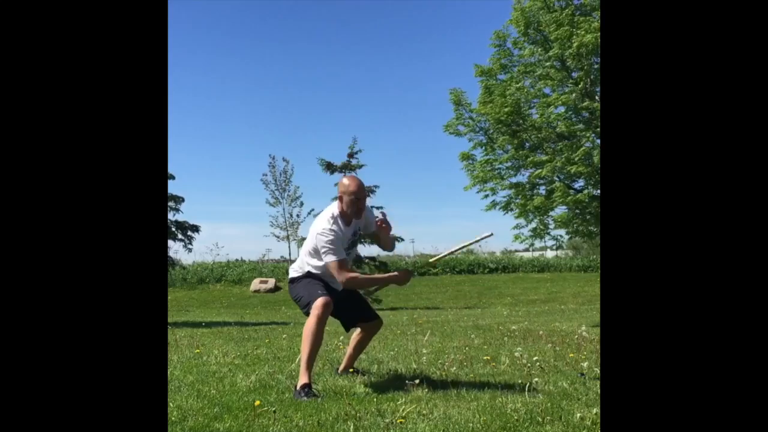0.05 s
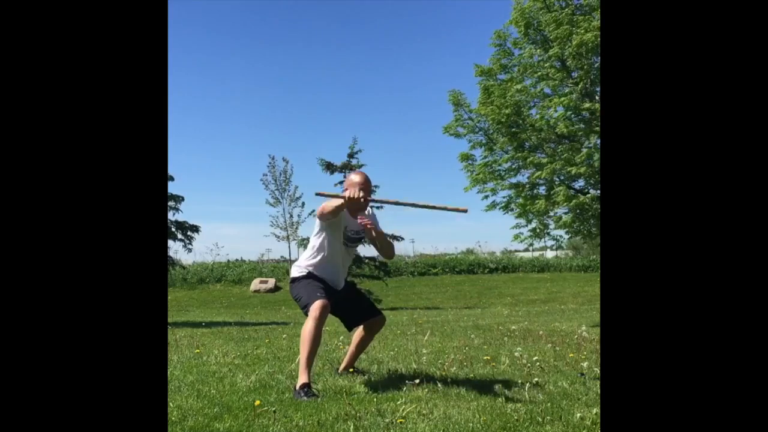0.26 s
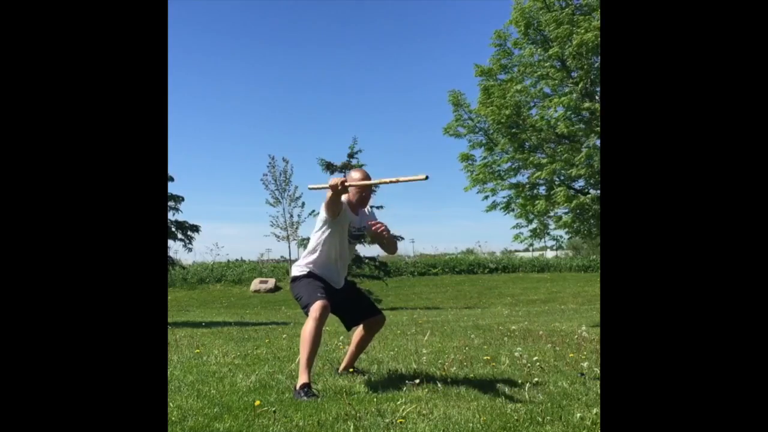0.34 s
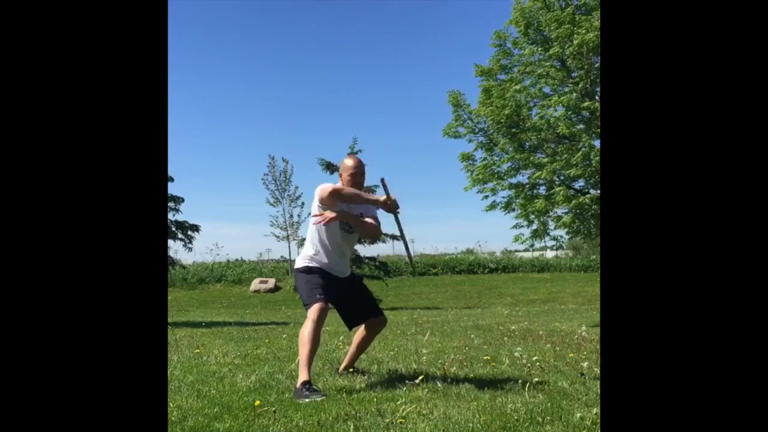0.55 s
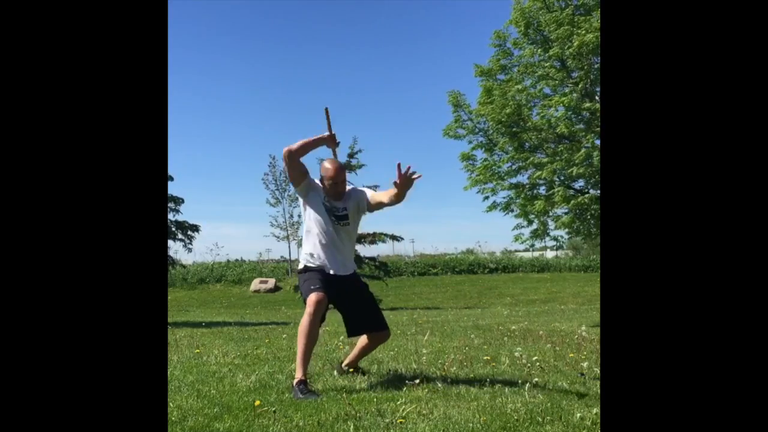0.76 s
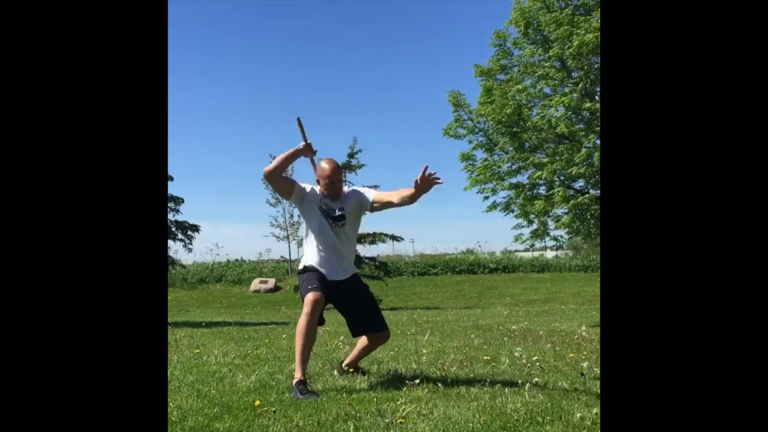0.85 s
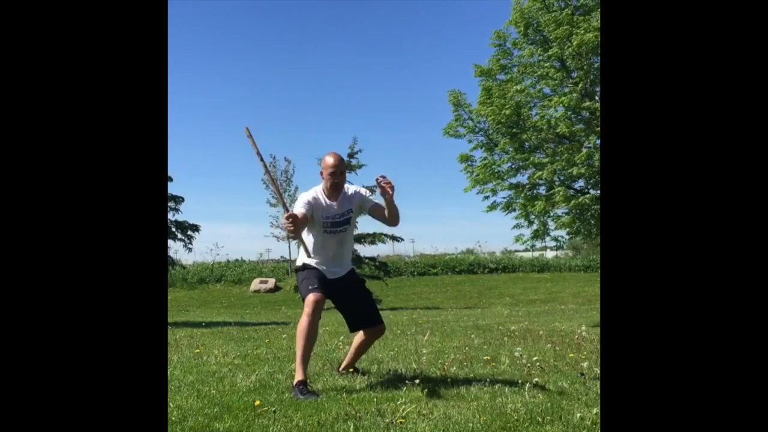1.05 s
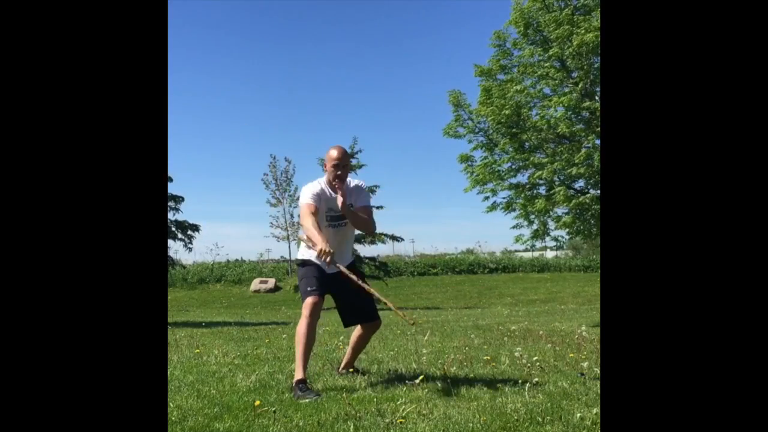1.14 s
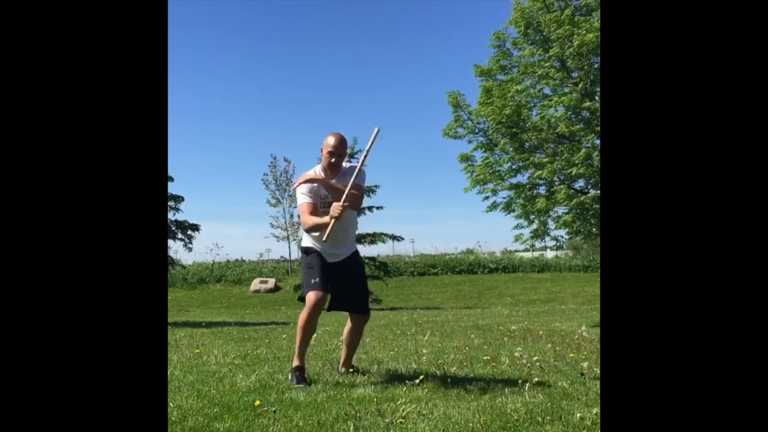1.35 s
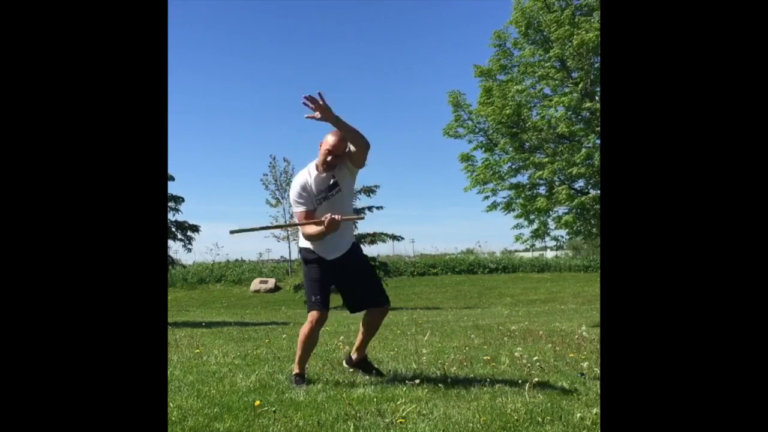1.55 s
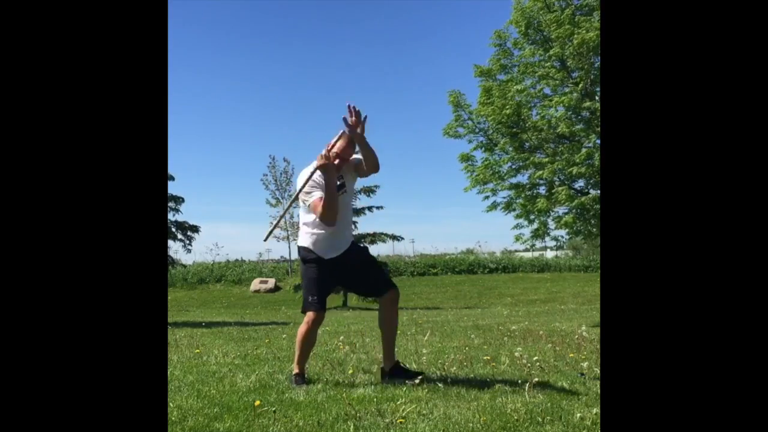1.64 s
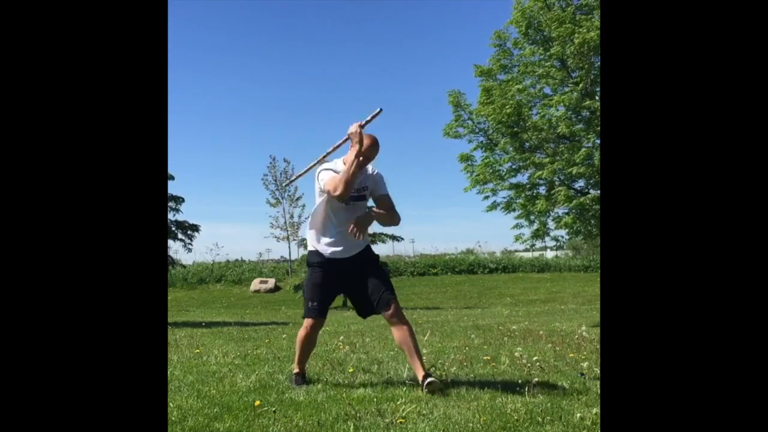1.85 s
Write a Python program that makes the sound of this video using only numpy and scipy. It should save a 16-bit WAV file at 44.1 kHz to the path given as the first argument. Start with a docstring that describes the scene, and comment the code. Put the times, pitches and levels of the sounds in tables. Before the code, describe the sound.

One sharp stick slap on a palm, followed by light swishes, body slaps and faint birdsong.

```python
"""Stick drill on an open lawn.

A stick cracks once against a bare hand: the impact excites damped modes, the turf reflects
the sound and the trees scatter it back. Softer slaps land on the body, sleeves and stick
swish through the air, and footwork thumps on the turf. Small birds twitter in the trees
over a low rumble and faint far whistles, while a light breeze buffets the microphone."""
import sys
import numpy as np
from scipy import signal
from scipy.fft import rfft, irfft
from scipy.io import wavfile

SR = 44100
rng = np.random.default_rng(int(sys.argv[2]) if len(sys.argv) > 2 else 0)


def transcribe(u):
    """Save the signal u as a 16-bit wav file named by the first command-line argument.

    u: samples, shape (n,) or (channels, n), limited to [-1, 1]; the rate is SR.
    q: integer samples, one column per channel.
    """
    v = np.clip(np.atleast_2d(u).T, -1, 1)
    q = np.round(v * 32767).astype(np.int16)
    wavfile.write(sys.argv[1], SR, q)


N = 83790
T = np.arange(N) / SR

# Envelopes of the breeze, the rumble and the flock. Each row: time in seconds, level in dB.
GUST_LEVELS = [(0, -100), (.045, -61), (.31, -65), (.52, -64.5), (.62, -56), (.66, -71.5), (.76, -59.5),
               (.85, -62.5), (1.01, -56.5), (1.17, -58.5), (1.22, -74), (1.33, -60), (1.78, -70),
               (1.845, -56.5), (1.9, -74)]
RUMBLE_LEVELS = [(0, -55), (.15, -63.5), (.3, -65), (.75, -67), (1.0, -59.5), (1.17, -69), (1.43, -57.5),
                 (1.7, -65.5), (1.9, -65)]
TWITTER_LEVELS = [(.03, -61), (.13, -61.5), (.2, -60.5), (.3, -79.5), (.42, -64.5), (.56, -88), (.76, -68),
                  (.87, -62.5), (1.02, -72.5), (1.18, -78.5), (1.46, -62), (1.55, -93.5), (1.72, -72),
                  (1.9, -69)]
# Spectra of the noise sources. Each row: frequency in Hz, relative spectral density in dB.
GUST_SPECTRUM = [(22, -32), (36, -10.5), (50, 1.5), (75, -2), (110, -5), (170, -31.5), (400, -72)]
RUMBLE_SPECTRUM = [(60, -8.5), (130, 2.5), (250, 2), (340, -8), (480, -23.5), (1000, -64)]
AIR_SPECTRUM = [(500, -1.5), (1100, -3.5), (2100, -8.5), (2800, -4.5), (3600, -14), (6200, -10.5),
                (7500, -16.5), (13000, -22.5), (16000, -22.5)]
SWISH_SPECTRUM = [(200, -19.5), (500, -20.5), (850, -12), (1200, -1.5), (1650, -0.5), (2400, -8.5),
                  (3300, -2), (4700, -1), (9000, -9.5), (16000, -19)]
SLAP_SPECTRUM = [(200, -10), (480, -23), (720, -2), (1130, 0), (1600, -10.5), (2200, 2.5), (3100, 2.5),
                 (4300, -10), (6600, -1), (8000, -8), (11000, -7.5), (16000, -16)]
SKIN_SPECTRUM = [(200, -33), (700, -27), (1300, -18.5), (3000, 0), (5000, 19), (11000, 22), (16000, -11)]
# Far whistles. Each row: start in seconds, length in seconds, frequency in Hz, level in dB.
FAR_WHISTLES = [(0.497, 0.45, 2799, -78), (1.029, 0.14, 1188, -73), (1.155, 0.027, 7480, -71.5),
                (1.447, 0.082, 7380, -70), (1.527, 0.043, 7380, -69.5), (1.621, 0.08, 1146, -66.5)]
# Bird notes. Each row: start and length in seconds, first and last pitch in Hz, relative level in dB.
BIRD_NOTES = [(0.074, 0.026, 6050, 6020, -56), (0.117, .011, 4300, 5600, -57),
              (0.372, 0.057, 5744, 6225, -57), (0.443, .022, 3200, 3780, -62.5),
              (0.484, 0.013, 4600, 4950, -59.5), (0.739, 0.017, 4500, 5380, -57),
              (0.79, 0.045, 5650, 6360, -61.5), (0.823, .03, 4100, 4810, -61),
              (0.893, 0.024, 4300, 4730, -59), (0.984, 0.065, 5850, 5504, -56),
              (1.21, 0.022, 4780, 4100, -69), (1.257, 0.0227, 3210, 3670, -59),
              (1.376, 0.032, 5700, 6550, -62.5), (1.394, 0.0225, 4070, 4340, -63.5),
              (1.718, 0.019, 6150, 5970, -55.5), (1.742, 0.047, 5500, 5660, -63)]
# One bird's buzzy falling phrase. Each row: as for the notes, timed from the start of the phrase.
PHRASE_NOTES = [(0, 0.015, 3700, 3410, -5), (.023, 0.015, 3260, 3710, 0.5), (0.04, 0.021, 3346, 3210, -6.5),
                (.06, 0.016, 3050, 2900, -4)]
# Repeats of that phrase. Each row: start in seconds, relative level in dB.
PHRASE_STARTS = [(0.077, -51), (0.918, -54), (1.651, -55.5)]
# Footwork. Each row: time of the peak in seconds, level in dB.
FOOT_THUMPS = [(0.378, -44.5), (.483, -44.5), (0.697, -43.5)]
# Swings. Each row: time of fastest motion in seconds, level in dB, rise and fall in seconds,
# tilt in dB per octave.
STICK_SWINGS = [(.025, -58.5, 0.022, 0.028, 3), (0.684, -65.5, 0.013, 0.028, -3),
                (0.73, -58, 0.02, 0.023, -4), (1.318, -59.5, 0.031, 0.044, -1),
                (1.432, -58, 0.033, 0.024, -3.5), (1.651, -61.5, 0.033, 0.075, -4.5),
                (1.669, -60.5, 0.034, 0.06, 8)]
# Light contacts on hand and body. Each row: time of the peak in seconds, level in dB,
# attack and T60 in seconds, tilt in dB per octave.
CONTACTS = [(0.0133, -42.5, 0.00075, 0.0053, -0.5), (0.022, -43.5, 0.0027, 0.024, -2),
            (0.2099, -36, 0.00019, 0.0027, -2), (1.276, -51, 0.00078, .0092, -2),
            (1.2843, -34.5, 0.0014, 0.023, -1), (1.286, -38.5, .0005, 0.0064, 5.5),
            (1.319, -51, .003, .015, -4)]
# Strength of the scatter from lawn and trees. Each row: frequency in Hz, gain in dB.
SCATTER_GAINS = [(200, -10.5), (650, -20.5), (1600, -13), (2400, -4), (3400, -18.5), (8500, -20),
                 (15000, -30)]
# Decay of that scatter. Each row: frequency in Hz, T60 in seconds.
SCATTER_DECAYS = [(200, 0.21), (2400, 0.24), (5000, 0.22), (14000, 0.2)]
# Modes of stick and palm. Each row: frequency in Hz, relative level in dB, T60 in seconds.
HIT_MODES = [(293, -10.5, 0.023), (1305, 1.5, 0.0067), (2377, -2.5, 0.017), (2846, -2.5, 0.017),
             (3827, 3.5, 0.0036), (5750, 3, 0.0057), (7170, 14.5, 0.00089), (11200, 12.5, 0.0011)]
CRACK_S = .21165


def from_db(db):
    """Amplitude grows tenfold for every 20 dB."""
    return 10 ** (np.asarray(db) / 20)


def unit_rms(x):
    """Division by the rms gives a signal unit power."""
    return x / np.sqrt(np.mean(x ** 2) + 1e-20)


def at_hz(points, hz):
    """Interpolation along a logarithmic frequency axis."""
    freqs, values = np.transpose(points)
    return np.interp(np.log(np.maximum(hz, 1)), np.log(freqs), values)


def envelope(rows):
    """A gain that moves linearly in decibels between points in time."""
    return from_db(np.interp(T, *np.transpose(rows)))


def noise(spectrum, tilt_db=0):
    """Spectral shaping colours white noise and tilts it per octave, at unit power."""
    hz = np.maximum(np.fft.rfftfreq(N, 1 / SR), 1)
    gain = from_db(at_hz(spectrum, hz) + tilt_db * np.log2(hz))
    return unit_rms(irfft(rfft(rng.standard_normal(N)) * gain, N))


def decay(t, t60):
    """Exponential damping: unity until t = 0, then 60 dB down in each t60."""
    return np.exp(-np.log(1000) * np.maximum(t, 0) / t60)


def tone(hz):
    """The phase of a sinusoid is the integral of its frequency."""
    return np.sin(2 * np.pi * np.cumsum(hz) / SR)


def open_air():
    """Turbulent pressure on the microphone adds to a low rumble and a faint steady hiss."""
    gusts = envelope(GUST_LEVELS) * noise(GUST_SPECTRUM)
    rumble = envelope(RUMBLE_LEVELS) * noise(RUMBLE_SPECTRUM)
    return gusts + rumble + from_db(-71.5) * noise(AIR_SPECTRUM)


def whistles():
    """Faint tones swell and fade, wavering under slight frequency modulation."""
    waver = .0029 * noise([(10, 0), (60, 0), (300, -40)])
    return sum(from_db(db) * np.sin(np.pi * np.clip((T - start) / length, 0, 1)) * tone(hz * (1 + waver))
               for start, length, hz, db in FAR_WHISTLES)


def twitter():
    """Superposition of short random chirps, gliding up or down, makes the sound of a flock."""
    chirps_per_s, chirp_s, low_hz, high_hz, max_glide = 230, .0142, 3114, 5946, .1324
    progress = np.linspace(0, 1, int(chirp_s * SR))
    flock = np.zeros(N + len(progress))
    for when, pitch, slope in rng.random((int(chirps_per_s * N / SR), 3)):
        centre_hz = low_hz + pitch * (high_hz - low_hz)
        glide = 1 + max_glide * (2 * slope - 1) * (2 * progress - 1)
        start = int(when * N)
        flock[start:start + len(progress)] += np.sin(np.pi * progress) * tone(centre_hz * glide)
    return envelope(TWITTER_LEVELS) * unit_rms(flock[:N])


def bird_note(start, length, first_hz, last_hz, db, flutter):
    """Frequency modulation roughens a linear glide into a warble or a buzz."""
    progress = np.clip((T - start) / length, 0, 1)
    hz = (first_hz + (last_hz - first_hz) * progress) * (1 + flutter)
    return from_db(db) * np.sqrt(2 * np.abs(np.sin(np.pi * progress))) * tone(hz)


def birds():
    """Song arrives by a direct path and again smeared by scattering in the foliage."""
    flutter_hz, warble_depth, buzz_depth = 303, .02805, .042
    flutter = unit_rms(signal.sosfilt(signal.butter(2, flutter_hz, fs=SR, output="sos"),
                                      rng.standard_normal(N)))
    foliage = rng.standard_normal(N) * decay(T, t60=.2)
    song = twitter() + sum(bird_note(*row, warble_depth * flutter) for row in BIRD_NOTES)
    song += sum(bird_note(start + offset, length, first_hz, last_hz, db + accent, buzz_depth * flutter)
                for start, db in PHRASE_STARTS
                for offset, length, first_hz, last_hz, accent in PHRASE_NOTES)
    echo = signal.fftconvolve(song, foliage / np.linalg.norm(foliage))[:N]
    return from_db(-2.5) * song + from_db(-3.5) * echo


def footwork():
    """Each shift of weight on the turf radiates a low wave packet of a few cycles."""
    hz, width_s = 76, .0069
    return sum(from_db(db) * np.exp(-.5 * ((T - peak) / width_s) ** 2)
               * np.sin(2 * np.pi * hz * (T - peak)) for peak, db in FOOT_THUMPS)


def swishes():
    """Flow noise from sleeves and stick rises and falls with the speed of each swing."""
    return sum(from_db(db) * np.exp(-.5 * ((T - peak) / np.where(T < peak, rise, fall)) ** 2)
               * noise(SWISH_SPECTRUM, tilt) for peak, db, rise, fall, tilt in STICK_SWINGS)


def slaps():
    """Heavily damped contacts give brief bursts of noise, duller on cloth than on skin."""
    return sum(from_db(db) * np.exp(np.minimum(T - peak, 0) / attack) * decay(T - peak, t60)
               * noise(SLAP_SPECTRUM, tilt) for peak, db, attack, t60, tilt in CONTACTS)


def scatter(sound):
    """Diffuse scattering from lawn and trees leaves a tail in which each band dies at its own rate."""
    t, tail = T[:N // 3], 0
    hold_exponent = 1.324   # above 1 the echo holds, then drops away
    edges_hz = np.geomspace(140, 17000, 13)
    for low, high in zip(edges_hz, edges_hz[1:]):
        hz = np.sqrt(low * high)
        fade = decay((t / at_hz(SCATTER_DECAYS, hz)) ** hold_exponent, 1)
        bandpass = signal.butter(2, [low, high], "band", fs=SR, output="sos")
        band = signal.sosfilt(bandpass, rng.standard_normal(len(t)))
        tail += band * fade / np.linalg.norm(fade) * from_db(at_hz(SCATTER_GAINS, hz))
    return signal.fftconvolve(sound, tail)[:N]


def crack():
    """Impact excites damped modes of stick and palm, flattening skin smacks, and turf reflects both."""
    ring_db, smack_db, smack_hold_s, turf_db, turf_lag_s = -20.5, -29, .001, -20, .000853
    age = (np.cumsum(T >= CRACK_S) - 1) / SR
    ring = sum((-1) ** k * from_db(ring_db + db) * np.sin(2 * np.pi * hz * age) * decay(age, t60)
               for k, (hz, db, t60) in enumerate(HIT_MODES))
    smack = from_db(smack_db) * noise(SKIN_SPECTRUM) * decay(age - smack_hold_s, t60=.005)
    direct = (age >= 0) * (ring + smack)
    return direct + from_db(turf_db) * np.interp(T - turf_lag_s, T, direct)


def scene():
    """The sources and their echoes add by linear superposition, in mono."""
    soft_hits = slaps()
    crack_impulse = signal.unit_impulse(N, int(CRACK_S * SR))
    echo = scatter(from_db(9.5) * crack_impulse + from_db(2) * soft_hits)
    drill = crack() + soft_hits + echo + swishes() + footwork()
    return (drill + whistles() + open_air() + birds())[None]


def record(dry):
    """A steep low-pass filter removes the highest treble."""
    stopband_db, stopband_hz = 70, 16900
    return signal.sosfilt(signal.cheby2(14, stopband_db, stopband_hz, fs=SR, output="sos"), dry)


dry = scene()
out = record(dry)
transcribe(out)
```